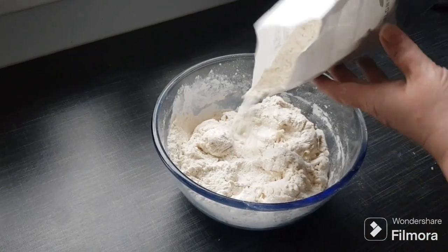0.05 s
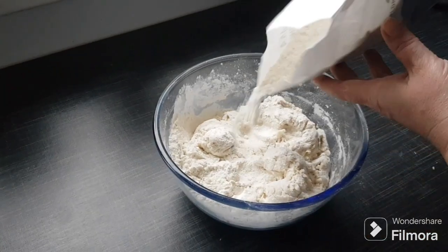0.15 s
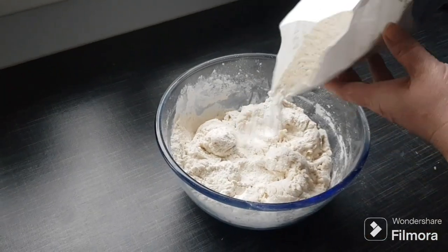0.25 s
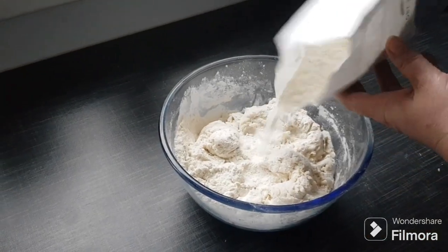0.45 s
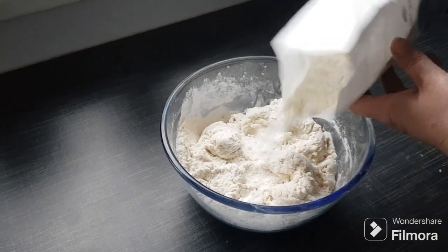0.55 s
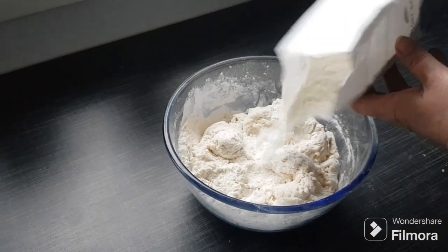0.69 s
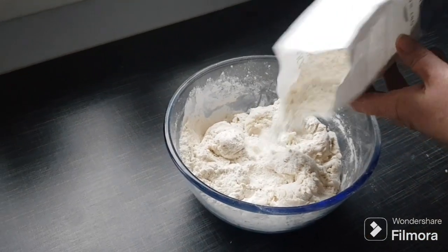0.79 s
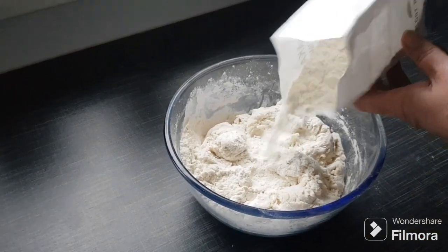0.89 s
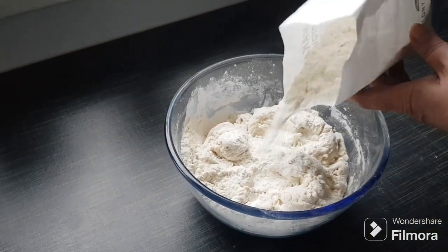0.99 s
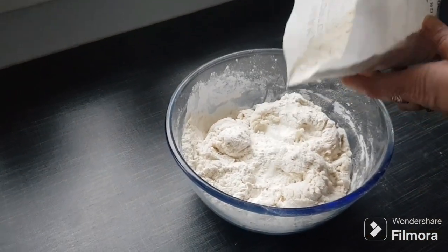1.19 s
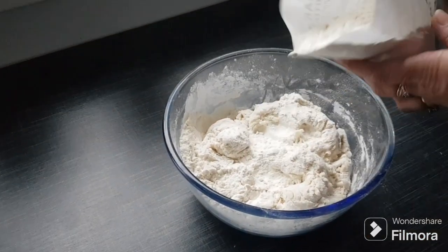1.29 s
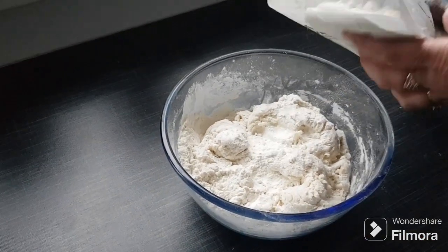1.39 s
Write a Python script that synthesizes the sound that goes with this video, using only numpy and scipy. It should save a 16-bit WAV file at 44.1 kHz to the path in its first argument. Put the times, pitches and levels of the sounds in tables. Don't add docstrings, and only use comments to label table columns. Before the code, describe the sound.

A hand slaps a flour-filled paper bag: one loud, dry, cracking smack at about 0.28 s, preceded by faint paper pops and soft thumps around 0.2 s. The bag pops back at 0.32 s. Quiet crinkles and dull knocks follow near 0.5 s, a bright paper flick at 0.8 s, small pops around 1.2 s. Flour hisses faintly in surges throughout; short, dense kitchen reverberation, close stereo microphone, low room tone.

```python
import sys
import numpy as np
from scipy import signal
from scipy.io import wavfile

SR = 44100
rng = np.random.default_rng(int(sys.argv[2]) if len(sys.argv) > 2 else 0)


def int16_out(signal):
    q = np.round(np.clip(np.atleast_2d(signal).T, -1, 1) * 32767)
    wavfile.write(sys.argv[1], SR, q.astype(np.int16))


def convert_level_to_amplitude(level_db):
    exponent = np.asarray(level_db, float) / 20
    return 10 ** exponent


N = 63945
FAR_DAMPING = 1.72

# (time [s], panel level [dB], crack level [dB])
SLAP_CONTACTS = [
    (.2727, -42, -50),
    (.2749, -28, -40),
    (.2760, -26, -32),
    (.2768, -22, -14),
    (.2779, -19, -14),
    (.2799, -31, -28),
    (.2823, -24, -34),
]
# (time [s], level [dB],
# pitch [Hz], rise to the peak [cycles], left over right [dB])
BUCKLES = [(.002, -56, 1960, 3.9, 1), (0.1757, -37.5, 1210, 2.2, -4), (.1757, -58, 3920, 6.7, -15),
           (.179, -50, 2460, 2.4, -4), (.204, -60, 2600, 3, -3), (.2175, -60, 2100, 3, 0),
           (.203, -35, 892, 1.65, 14.5), (.203, -37, 1710, 2.9, 2), (.2085, -42, 1115, 1.9, -26.5),
           (.2118, -46, 1050, 1.7, 26), (0.327, -27.5, 923, 1.8, 3.5), (0.4817, -39.5, 1940, 1.6, -4.5),
           (.4828, -41, 1116, 2.04, 9.5), (.493, -70, 3260, 2.9, 5), (.511, -44.5, 1460, 2.1, -10),
           (.541, -51, 920, 1.6, 0), (.773, -49.5, 2030, 3.5, 1), (.794, -51.5, 1290, 3.1, -7),
           (.8034, -46.5, 7420, 11, -9), (.8032, -34, 12200, 2.4, -22), (.8033, -49, 4660, 4, -12),
           (.8275, -50.5, 3770, 2.9, -21), (.839, -49, 3000, 1.7, -11), (.842, -47, 1260, 1.8, -10),
           (.92, -49.5, 644, 1.8, -17), (1.121, -44.5, 1130, 2.7, -4), (1.17, -48.5, 1340, 2, -10),
           (1.2239, -40, 1017, 2.37, -7), (1.2225, -40.5, 1960, 2.7, -1)]


def slap(damping):
    # (frequency [Hz], level [dB], decay time T60 [s])
    panel_modes = [
        (76.7, -29, 0.064),
        (220, -32, 0.031),
        (317, -18.5, 0.17),
        (513, -7, 0.0086),
        (955, -1.5, 0.017),
        (1280, 6, 0.0051),
        (1654, 5.5, 0.011),
        (2200, 6.5, 0.0033),
        (2854, -8.5, 0.013),
        (4530, -9, 0.017),
    ]
    port_lag_s = 0.00017
    contact, mode = np.arange(len(SLAP_CONTACTS))[:, None], np.arange(1, 11)
    spreads = np.cos(contact * mode * 2)
    out = np.zeros((2, N))
    for (s, db, _), row in zip(SLAP_CONTACTS, spreads):
        for k, ((hz, level_db, t60), spread) in enumerate(zip(panel_modes, row)):
            for side in range(2):
                port_db = 7.7 * spread * (1 - 2 * side) * min(1, hz / 1000)
                tone = ring(s + port_lag_s * side, db + level_db + port_db, hz, t60 / damping)
                out[side] += (-1) ** k * tone
    return pan(band_filter(out, 2, 75, "high") * np.sqrt(damping), 0.25)


def crack():
    # (frequency [Hz], level [dB per Hz])
    crack_colour = [(1500, -4), (3000, -1.5), (4700, -6), (6300, -2), (8200, -3), (10500, -8.5),
                    (13000, -1), (16000, -13)]
    t60_s = .0055
    t = np.arange(N) / SR
    noise = bands(lambda hz: convert_level_to_amplitude(at_hz(crack_colour, hz)))
    noise = rms_one(dip(dip(noise)))
    return noise * sum(convert_level_to_amplitude(db - 60 * np.maximum(t - s, 0) / t60_s) * (t > s) for s, _, db in SLAP_CONTACTS)


def snap():
    pulse = click([(.2775, 10)], [2180, 16000])
    return .45 * pulse + .55 * dip(pulse)


def pops(damping):
    # (time [s], level [dB], pitch [Hz], rise to the peak [cycles], left over right [dB])
    rebounds = [
        (.3226, -18.5, 1540, 2.7, 0),
        (.3228, -25, 980, 1.6, 0),
    ]
    overtone, overtone_db = 1.208, -4
    out = 0
    for s, db, hz, cycles, lr in BUCKLES + rebounds:
        tone = swell(s, db, hz, cycles / damping)
        upper = swell(s, db + overtone_db, min(hz * overtone, 15000), cycles / damping)
        out = out + pan(tone + upper, lr)
    return out * np.sqrt(damping)


def scuffs():
    scuff_db, t60_s = -1, 0.013
    t = np.arange(N) / SR
    gate = 0
    for s, db, hz, _, _ in BUCKLES:
        if hz < 2500:
            gate = gate + convert_level_to_amplitude(db + scuff_db - 60 * np.maximum(t - s, 0) / t60_s) * (t > s)
    noise = rng.standard_normal(N) + 0.67 * rng.standard_normal((2, N))
    return band_filter(gate * noise, 3, [497, 2550])


def ticks():
    # (time [s], level [dB])
    edge_flicks = [
        (.666, -42),
        (.7922, -33),
        (.8033, -22),
        (.8045, -36),
        (.8074, -38),
    ]
    return pan(click(edge_flicks, [4420, 13700]), -15)


def thumps(damping):
    # (time [s], level [dB], pitch [Hz], rise to the peak [cycles])
    knocks = [(0.01, -44, 221, 1.93), (0.057, -45, 257, 1.24), (.088, -83, 200, 1.2),
              (0.177, -41.5, 340, 0.77), (.202, -32.5, 350, 1.22), (0.213, -49.5, 369, 5.6),
              (.281, -36.5, 244, 1.38), (.218, -38, 406, 0.73), (.324, -37.5, 527, 3.7),
              (.326, -41.5, 291, 1.73), (0.5013, -39.5, 410, 0.47), (0.51, -43.5, 365, 1.1),
              (0.521, -49, 404, 1.36), (.539, -48, 448, 0.75), (0.595, -48, 277, 0.53),
              (.616, -84.5, 298, 1.5), (0.709, -52.5, 239, 1.6), (0.737, -48.5, 236, 1.95),
              (0.921, -65, 410, 0.38), (.92, -43, 95, 1.05)]
    out = sum(swell(s, db, hz, cycles / damping) for s, db, hz, cycles in knocks)
    return pan(out, -3) * np.sqrt(damping)


def powder():
    # (time [s], level [dB])
    flow = [(0, -65.5), (.143, -80), (.15, -55), (.2, -60.5), (.45, -61.5), (.55, -69), (.66, -63),
            (.7, -80.5), (.715, -49), (.78, -56.5), (.85, -50), (.91, -61), (.96, -48.5), (1.12, -66.5),
            (1.2, -50.5), (1.29, -69), (1.33, -55), (1.45, -53.5)]
    # (frequency [Hz], level [dB per Hz])
    hiss = [(1180, -67.5), (2000, 12), (2800, -1), (4410, 4), (6950, 1.5), (8800, 3), (14000, 1)]
    # (time [s], level [dB])
    drag = [(0, -54), (.08, -63.5), (.15, -76), (.47, -53.5), (.52, -61), (.68, -88), (.72, -54.5),
            (.8, -60), (.9, -60.5), (.94, -52.5), (1.05, -57.5), (1.15, -63.5), (1.2, -52.5), (1.28, -59),
            (1.45, -62.5)]
    # (frequency [Hz], level [dB per Hz])
    slide = [(300, 2), (600, 5.5), (1000, 4.5), (2000, 0.5), (4000, -3.5), (8000, -33.5)]
    # (time [s], level [dB])
    singing = [(.9, -98), (.94, -58), (1.03, -62.5), (1.07, -70), (1.115, -65.5), (1.13, -85), (1.17, -70),
               (1.25, -61), (1.28, -88)]
    # (time [s], level [dB])
    grip = [(0, -44), (.1, -74), (.3, -54.5), (.62, -71), (.69, -96), (.73, -59), (.87, -57.5), (1.1, -65),
            (1.45, -70.5)]
    # (frequency [Hz], level [dB per Hz])
    rumble = [(25, 6), (50, -7), (100, 0.5), (200, -9), (350, -7.5), (600, -51)]
    mouth_hz, width_hz = 2126, 150
    edges = [mouth_hz - width_hz / 2, mouth_hz + width_hz / 2]
    mouth = rms_one(band_filter(rng.standard_normal((2, N)), 2, edges))
    out = convert_level_to_amplitude(in_time(flow)) * patchy(hiss, patchy_db=0.97, grain_db=3.5)
    out = out + convert_level_to_amplitude(in_time(drag)) * patchy(slide, patchy_db=1.53, grain_db=1.5)
    out = out + convert_level_to_amplitude(in_time(singing)) * mouth
    return out + convert_level_to_amplitude(in_time(grip)) * patchy(rumble, patchy_db=-0.2, grain_db=0.7)


def kitchen(x):
    # (frequency [Hz], decay time T60 [s])
    room_t60 = [(100, 1), (260, 0.33), (700, 0.39), (1840, 0.31), (4850, 0.37), (12800, 0.27)]
    # (frequency [Hz], level [dB])
    room_colour = [(100, -16), (300, -3), (1000, -4), (2000, -5), (4000, -5), (8000, -6.5), (13000, -12.5)]
    room_db, start_s, build_s = -33, 0.00049, 0.00053
    early_db, early_s = 4, 0.004
    t = np.maximum(np.arange(N) / SR - start_s, 0)
    echoes = bands(lambda hz: convert_level_to_amplitude(at_hz(room_colour, hz) - 60 * t / at_hz(room_t60, hz)), grain_db=2.0)
    echoes = echoes * (1 - np.exp(-t / build_s)) * convert_level_to_amplitude(early_db * np.exp(-t / early_s))
    return convert_level_to_amplitude(room_db) * signal.fftconvolve(x, echoes, axes=1)[:, :N]


def room_tone():
    # (frequency [Hz], level [dB per Hz])
    background = [(30, -15.5), (50, 13), (90, -18), (230, 1.5), (740, -12), (2300, -27.5), (8000, -19.5),
                  (14000, -18)]
    return convert_level_to_amplitude(-60.5) * patchy(background, patchy_db=1.1, grain_db=0.9)


def ring(s, db, hz, t60):
    contact_s = 0.00016
    out, i = np.zeros(N), int(s * SR)
    t = np.maximum(np.arange(i, min(N, i + SR // 8)) / SR - s, 0)
    out[i:i + len(t)] = convert_level_to_amplitude(db - 60 * t / t60) * (1 - np.exp(-t / contact_s)) * np.sin(2 * np.pi * hz * t)
    return out


def swell(s, db, hz, cycles):
    out, i = np.zeros(N), int(s * SR)
    t = np.maximum(np.arange(i, min(N, i + SR // 8)) / SR - s, 0) * hz
    envelope = (t / cycles * np.exp(1 - t / cycles)) ** 2.5
    out[i:i + len(t)] = convert_level_to_amplitude(db) * envelope * np.sin(2 * np.pi * t)
    return out


def click(rows, edges_hz):
    out = np.zeros(N)
    for s, db in rows:
        out[int(s * SR)] = convert_level_to_amplitude(db)
    return band_filter(out + 1e-18, 2, edges_hz)


def patchy(spectrum, patchy_db, grain_db):
    together = drift(44)

    def shape(hz):
        return convert_level_to_amplitude(at_hz(spectrum, hz) + patchy_db * (together + drift(23)))
    return rms_one(bands(shape, grain_db))


def bands(shape, grain_db=0):
    # (frequency [Hz], left-right likeness [-1 to 1])
    likeness = [(60, 0.77), (180, 0.88), (550, 0.56), (1650, -0.015), (4970, -0.048), (15000, -0.048)]
    edges = 25 * 2 ** np.arange(0, 9.6, .5)
    grain = convert_level_to_amplitude(grain_db * np.minimum(rng.exponential(1, (2, 1, N)), 4.0))
    white = rng.standard_normal((2, 2, N)) * grain
    out = 0
    for k, (low, high) in enumerate(zip(edges, edges[1:])):
        mid, side = band_filter(white[k % 2], 2, [low, high])
        hz = np.sqrt(low * high)
        alike = np.clip(at_hz(likeness, hz), -1, 1)
        stereo = np.sqrt(1 + alike) * mid + np.sqrt(1 - alike) * side * [[1], [-1]]
        out = out + shape(hz) * stereo
    return out


def drift(rate):
    r = np.exp(-80 * np.pi * rate / SR)
    noise = rng.standard_normal(N // 40 + 2002)
    slow = signal.lfilter([1], [1, -2 * r, r * r], noise)[2000:]
    return np.interp(np.arange(N) / 40, np.arange(len(slow)), rms_one(slow))


def rms_one(x):
    return x / np.sqrt(np.mean(x ** 2) + 1e-20)


def in_time(rows):
    s, db = np.transpose(rows)
    return np.interp(np.arange(N) / SR, s, db)


def at_hz(points, hz):
    f, value = np.transpose(points)
    return np.interp(np.log(hz), np.log(f), value)


def pan(x, db):
    return x * convert_level_to_amplitude(np.array([[db / 2], [-db / 2]]))


def band_filter(x, order, hz, kind="band"):
    return signal.sosfilt(signal.butter(order, hz, kind, fs=SR, output="sos"), x)


def dip(x):
    return band_filter(x, 1, [5540, 7190], "stop")


def low_pass(x, hz):
    return signal.sosfilt(signal.cheby2(14, 60, hz, fs=SR, output="sos"), x)


def scene():
    small = scuffs() + ticks()
    near = crack() + small + slap(1) + pops(1) + thumps(1)
    near = band_filter(near, 2, 70, "high")
    nearer = np.where(np.arange(N) / SR > .7, convert_level_to_amplitude(-6), 1)
    far = snap() + slap(FAR_DAMPING)
    far = far + nearer * (small + convert_level_to_amplitude(-1.5) * pops(3.8))
    far = far + convert_level_to_amplitude(-2.5) * thumps(FAR_DAMPING)
    soft = powder() + room_tone() + kitchen(far)
    return low_pass(near, 15500) + low_pass(soft, 15050)


def top_cut(x):
    return signal.sosfilt(signal.butter(12, 15990, fs=SR, output="sos"), x)


def record(dry):
    mix = band_filter(dry, 4, 41, "high")
    return top_cut(mix)


dry = scene()
out = record(dry)
int16_out(out)
```